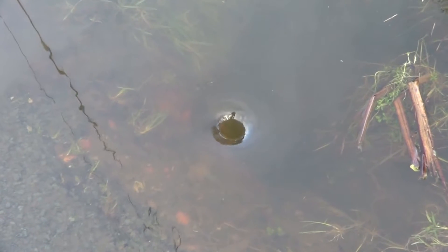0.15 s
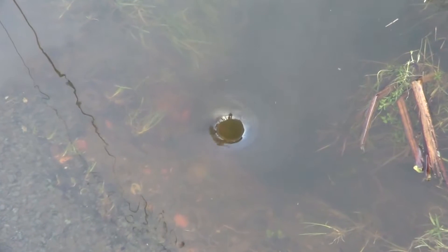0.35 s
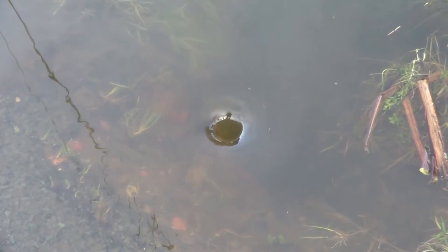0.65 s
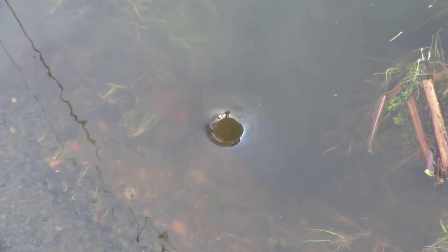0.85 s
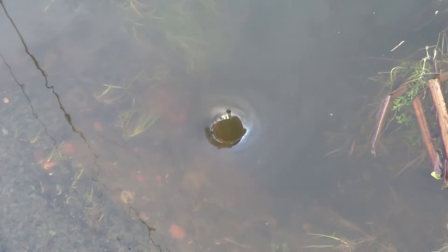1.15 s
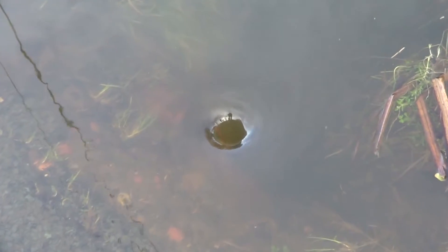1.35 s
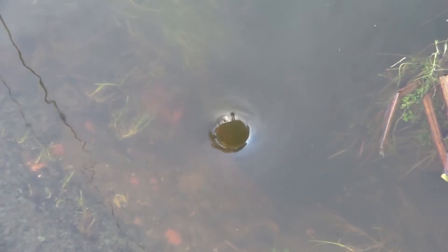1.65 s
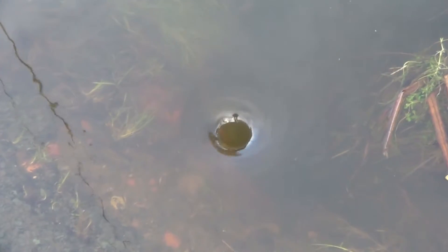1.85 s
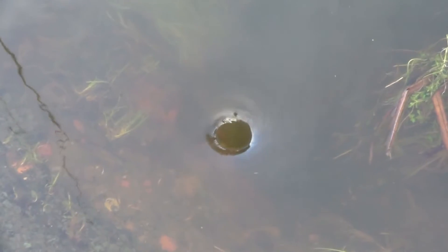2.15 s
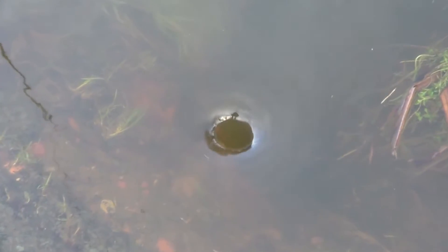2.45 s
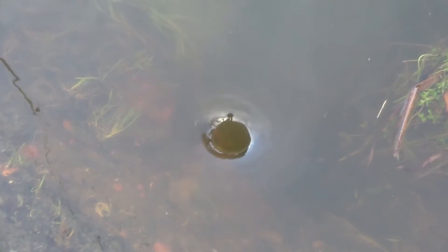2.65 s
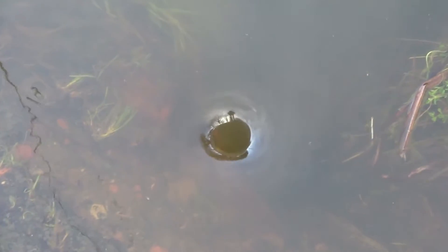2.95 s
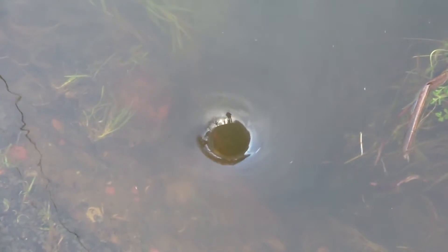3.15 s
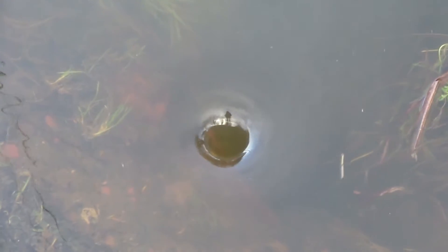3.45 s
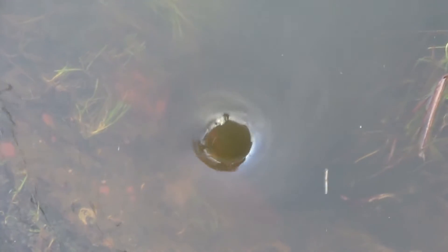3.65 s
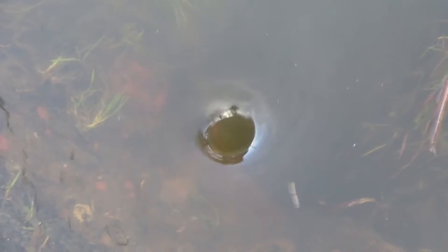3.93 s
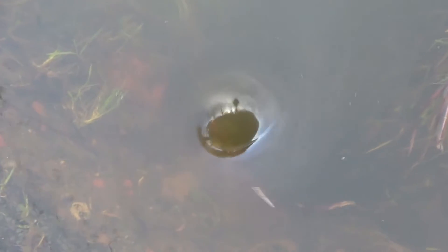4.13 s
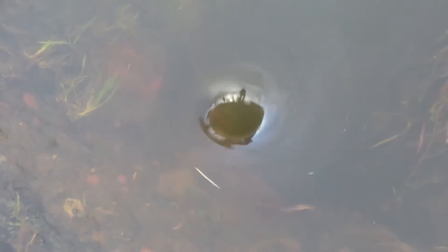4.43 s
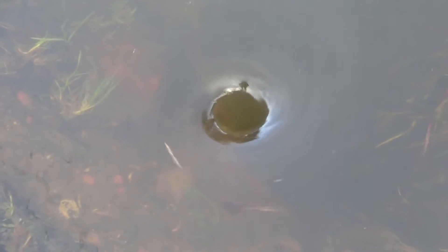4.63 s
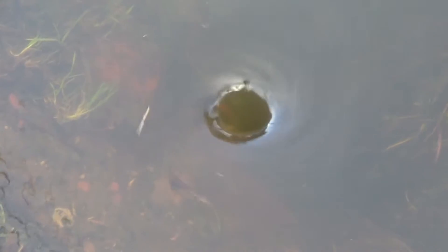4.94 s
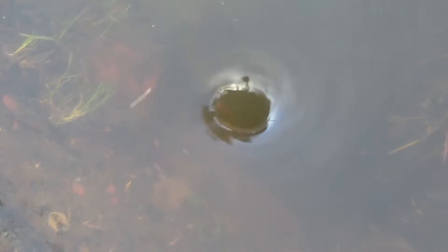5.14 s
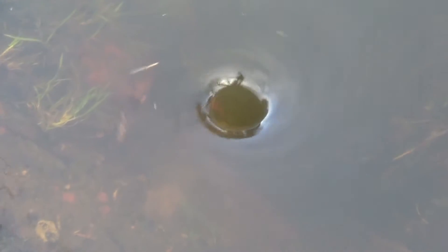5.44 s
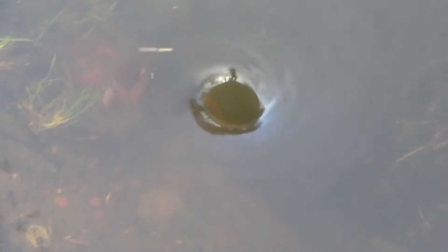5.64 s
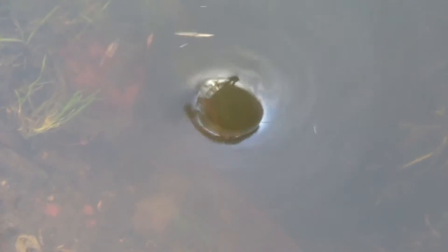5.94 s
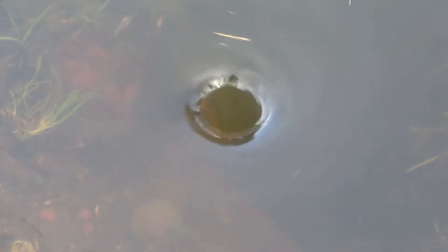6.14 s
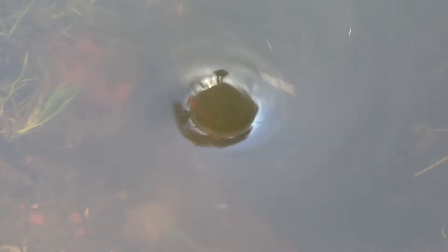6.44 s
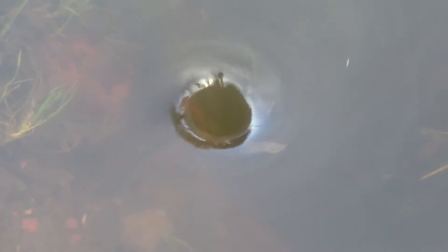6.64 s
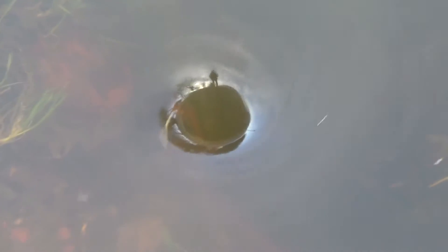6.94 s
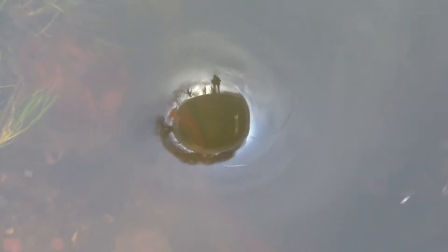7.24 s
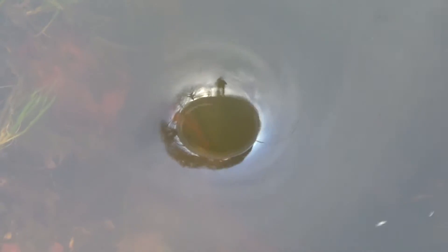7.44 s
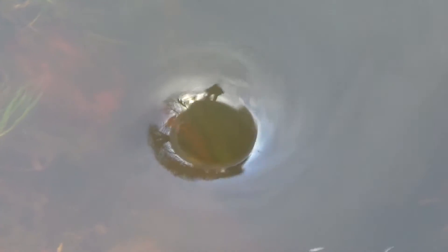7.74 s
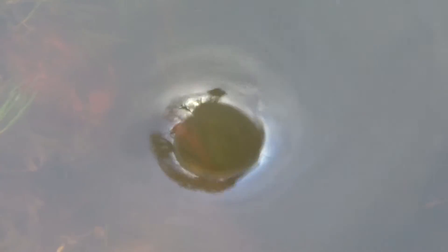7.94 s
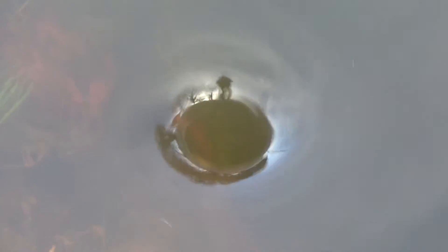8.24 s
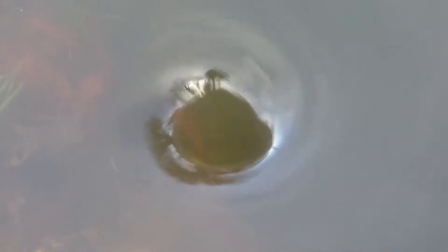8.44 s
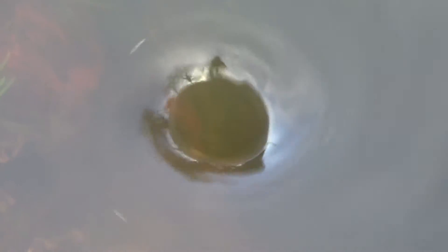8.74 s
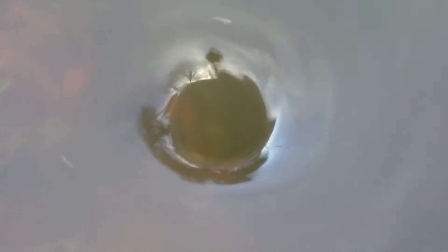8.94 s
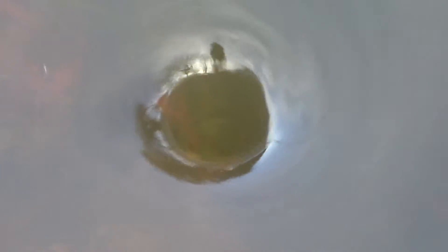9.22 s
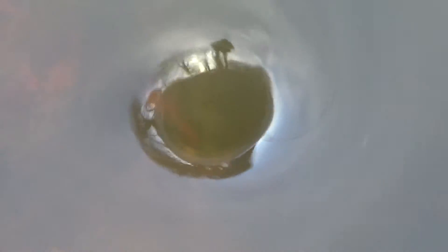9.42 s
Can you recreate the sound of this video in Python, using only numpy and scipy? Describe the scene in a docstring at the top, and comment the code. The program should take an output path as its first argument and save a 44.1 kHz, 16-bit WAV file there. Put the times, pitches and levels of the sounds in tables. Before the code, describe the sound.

Floodwater slurps down a small hole in a road, close to the microphone and straight ahead. It sucks air in quick gulps, with fizzing bubbles, sharp wet pops and a hollow gurgle. The slurping dies down, and small birds give thin whistles and a few chirps some way off. Then the gurgling returns for a second spell and fades, leaving a soft outdoor murmur.

```python
"""Floodwater slurps down a small hole in a road, close to the microphone and almost straight ahead.
Twice the whirlpool sucks air in quick gulps: swarms of bubbles gurgle and fizz, and single air pockets
snap shut and ring the throat of the funnel. In the lulls small birds whistle some way off, over a soft
outdoor murmur; the camera's electronics add a thin steady whine."""
import sys
import numpy as np
from scipy import signal
from scipy.fft import rfft, irfft, next_fast_len
from scipy.io import wavfile
from scipy.ndimage import uniform_filter1d

SR = 44100
rng = np.random.default_rng(int(sys.argv[2]) if len(sys.argv) > 2 else 0)


def generate_wav(sig):
    """Save sig (samples, or channels by samples) to the path in sys.argv[1] as 16-bit PCM at SR."""
    pcm = np.round(np.clip(np.atleast_2d(sig).T, -1, 1) * 32767).astype(np.int16)
    wavfile.write(sys.argv[1], SR, pcm)


N = 422478
TIME = np.arange(N) / SR


def amp(db):
    """Decibels to gain."""
    return 10 ** (np.asarray(db) / 20)


def unit(x):
    """Scales to an rms of one."""
    return x / np.sqrt(np.mean(x ** 2) + 1e-20)


def read(points, hz):
    """Reads a spectrum table on a log-frequency axis."""
    f, value = np.transpose(points)
    return np.interp(np.log(hz + 1), np.log(f + 1), value)


def add(mix, s, sound):
    """Mixes a sound in at s seconds."""
    part = mix[max(round(s * SR), 0):][:len(sound)]
    part += sound[:len(part)]


def wander(hz):
    """A smooth random drift of rms one, with changes up to about hz."""
    size = next_fast_len(N, True)
    f = np.fft.rfftfreq(size, 1 / SR)
    return unit(irfft(rfft(rng.standard_normal(size)) / (1 + (f / hz) ** 4), size)[:N])


def noise_band(hz, width):
    """A narrow band of noise around a pitch."""
    phase = 2 * np.pi * hz * TIME
    return wander(width) * np.cos(phase) + wander(width) * np.sin(phase)


def colour(x, points, size=2048):
    """Causal filter with a given spectrum, so that attacks stay sharp."""
    log_gain = np.log(amp(read(points, abs(np.fft.fftfreq(size, 1 / SR)))))
    taps = np.fft.ifft(np.exp(signal.hilbert(log_gain).conj())).real
    return signal.oaconvolve(x, taps)[:N]


def echoes(x, t60):
    """A diffuse tail of reflections with the energy of its source."""
    t = TIME[:SR // 2]
    tail = rng.standard_normal(len(t)) * amp(-60 * t / t60)
    return signal.oaconvolve(x, tail / np.linalg.norm(tail))[:N]


# Two spells of steady air draw at the hole, close up. Each row: time in seconds, relative level in dB,
# brightness in dB (spray up, large bubbles down).
FIRST_DRAW = [(0, -24, -0.5), (.3, -26.5, -3), (.42, -27, -1), (.9, -23.5, 0), (.98, -32, 0),
              (1.7, -26.5, -5), (2.6, -25.5, -3), (2.7, -31.5, -0.5), (2.85, -51.5, -2)]
SECOND_DRAW = [(5.55, -40.5, -1), (5.761, -25.5, -2.5), (6.0, -26, -1.5), (6.601, -22.5, -2.5),
               (7.149, -26, 1.5), (7.7, -31.0, 2.5), (8.05, -30, 3), (8.25, -36, 3.5), (8.65, -40, 5.5)]
# Separate gulps of air. Each row: start and length in seconds, relative level and brightness in dB.
GULPS = [(0.098, 0.2, -26.5, 2.5), (0.442, 0.21, -28, -1), (0.638, 0.089, -22.5, 0.5),
         (0.747, 0.14, -25.5, -3), (0.889, 0.049, -22, 0.5), (1.001, .08, -25.5, -3.5),
         (1.135, 0.066, -26, -7), (1.26, 0.088, -25, -2.5), (1.463, 0.12, -30.5, -0.5),
         (1.558, 0.086, -23.5, 1.5), (1.675, 0.14, -30.5, 9), (1.816, .12, -22, 1.5),
         (1.943, 0.12, -30.5, 9.5), (2.09, .14, -30, 7.5), (2.288, 0.097, -34, 2.5),
         (2.476, 0.096, -20.5, 0), (2.752, 0.02, -34.5, 1), (2.891, 0.017, -36, 1.5),
         (2.981, .11, -39.5, -2), (3.12, 0.046, -45, -9), (3.339, .127, -41, -1.5),
         (3.487, .124, -42.5, 0.5), (3.986, 0.029, -42, 4), (5.122, .025, -45, 1), (5.374, .055, -35, -3),
         (5.468, 0.048, -33, 3), (5.587, 0.11, -31, -6.5), (5.782, 0.066, -23, -1),
         (5.952, 0.061, -20.5, -5), (6.028, 0.087, -30.5, 5), (6.165, 0.048, -23, 1),
         (6.362, .12, -29, -5.5), (6.523, 0.023, -20.5, 1.5), (6.68, 0.14, -25.5, 1.5),
         (6.861, 0.059, -20, -2), (6.944, 0.27, -25.5, -4.5), (7.243, 0.17, -25, -5.5),
         (7.417, 0.24, -22.5, -1.5), (7.819, 0.08, -24, -1), (7.904, .058, -21.5, 0),
         (8.091, 0.046, -29.5, 6), (8.287, 0.016, -19.5, -3.5), (8.32, 0.052, -26, -2.5),
         (8.414, 0.052, -22.5, -3.5), (8.486, 0.072, -26, -3.5), (8.671, .14, -38, 6),
         (8.952, 0.099, -42.5, 0.5)]
def suction(size):
    """Steady draw plus gulps, in dB, for one bubble size (-1 large, 0 small, 1 spray)."""
    attack_s, release_s, sag_db = .008, 0.016, 1.5
    choke_s, choke_db = 0.032, -1.5  # the draw falters just before each gulp
    draw_power, gulp_power, falter_db = np.zeros((3, N))
    for spell in (FIRST_DRAW, SECOND_DRAW):
        s, level_db, bright_db = np.transpose(spell)
        drawing = (TIME >= s[0]) & (TIME <= s[-1])
        draw_power += amp(np.interp(TIME, s, level_db + size * bright_db)) ** 2 * drawing
    t = TIME[:SR // 2]
    for s, length, level_db, bright_db in GULPS:
        shape = np.minimum(t / attack_s, 1) * np.exp(-np.maximum(t - length, 0) / release_s)
        droop_db = sag_db * (np.minimum(t / length, 1) - .5)
        add(gulp_power, s, (shape * amp(level_db + size * bright_db - droop_db)) ** 2)
        add(falter_db, s - choke_s, choke_db * np.sqrt(t[t < choke_s] / choke_s))
    return 10 * np.log10(draw_power * amp(falter_db) ** 2 + gulp_power + 1e-9)


def bubble(hz, cycles, rise):
    """A ring that falls to 1/e in so many cycles; its pitch climbs as the air pocket shrinks."""
    turns = TIME[:int(6 * cycles / hz * SR) + 2] * hz
    tone = np.sin(2 * np.pi * turns * (1 + rise * turns / cycles))
    return tone * np.exp(-turns / cycles) * (1 - np.exp(-2 * turns))


# Colour of the bubbles beside the hole. Each row: frequency in Hz, relative level in dB.
SLURP_SPECTRUM = [(100, -41), (260, -23), (480, -13.5), (750, -1), (1050, -1), (1450, -0.5), (1950, -11.5),
                  (2350, -9), (2800, -9), (3700, -6.5), (5250, -16.5), (6800, -10.5), (11000, -14.5),
                  (13300, -22.5), (16000, -19)]
def swarm(level_db, surge, low_hz, high_hz, per_s, cycles, rise, spread_db, surge_db, froth_db):
    """Bubbles of random size pinch off: crowded in strong suction and surges, single when it slackens."""
    count = 30000
    when, chance, pitch, strength, damping = rng.random((count, 5)).T
    at = (when * (N - 1)).astype(int)
    strong_db = np.percentile(level_db[::SR // 100], 80)
    crowd = np.clip(amp(.8 * (level_db - strong_db)), .08, 1.3)
    born = chance < per_s * crowd[at] * amp(2 * surge[at]) * N / SR / count
    hz = low_hz * (high_hz / low_hz) ** pitch
    # a lone bubble in calm water rings longer than one in the froth
    crowding = np.where(hz < 4500, crowd[at], np.sqrt(crowd[at]))
    ring_cycles = cycles * 3.1 ** (2 * damping - 1) / crowding ** 0.8
    bubble_db = spread_db * np.minimum(-np.log(1 - strength), 4) + surge_db * surge[at]
    height = amp(bubble_db) * hz / np.sqrt(ring_cycles)
    bubbles = np.zeros(N)
    for i in np.flatnonzero(born):
        add(bubbles, at[i] / SR, height[i] * bubble(hz[i], ring_cycles[i], rise))
    # countless faint bubbles merge into a wet froth where the swarm is dense
    band = signal.butter(4, [low_hz, high_hz], "bandpass", fs=SR, output="sos")
    froth = signal.sosfilt(band, rng.standard_normal(N)) * crowd * amp(surge_db * surge)
    mix = unit(colour(unit(bubbles) + amp(froth_db) * unit(froth), SLURP_SPECTRUM))
    # the bubbles of any moment share the energy that the suction supplies
    power = uniform_filter1d(uniform_filter1d(mix ** 2, size=2200), size=1600)
    return amp(level_db) * mix / np.sqrt(abs(power) + 1e-3)


def slurp():
    """Large, small and tiny bubbles, all driven by the same unsteady collapse of the funnel."""
    surge = np.clip(wander(hz=46.8), -2, 2)
    gurgle = swarm(suction(size=-1), surge, low_hz=298.4, high_hz=1909, per_s=430,
                   cycles=3.14, rise=0.0047, spread_db=4.0, surge_db=1.05, froth_db=-12)
    babble = swarm(suction(size=0), surge, low_hz=1910, high_hz=5280, per_s=1200,
                   cycles=1.87, rise=0.011, spread_db=5.0, surge_db=1.8, froth_db=-7.5)
    spray = swarm(suction(size=1), surge, low_hz=5180, high_hz=14380, per_s=1300,
                  cycles=2.34, rise=0.013, spread_db=5.5, surge_db=2.0, froth_db=-8.5)
    flicker = amp(1.27 * wander(hz=16.4))
    return (amp(-5.0) * gurgle + amp(-0.66) * babble + amp(-0.05) * spray) * flicker


def stray_pockets(per_s=10, over_draw_db=14, throat_db=-10.5, count=400):
    """Rows for lesser pockets that burst at random, as strongly as the whirlpool draws air."""
    when, chance, strength, pitch, throat = rng.random((count, 5)).T
    at = (when * (N - 1)).astype(int)
    level_db = suction(size=0)[at] + over_draw_db + 9 * (strength - .5)
    bubble_hz, throat_hz = 2300 * 3.2 ** (pitch ** 2), 780 * 2.16 ** throat
    rows = np.transpose([at / SR, level_db, bubble_hz, throat_hz, level_db + throat_db])
    return rows[chance < per_s * N / SR / count]


# Air pockets snapping shut close to the microphone. Each row: start in seconds, relative level in dB,
# bubble pitch in Hz, throat pitch in Hz, relative throat level in dB.
AIR_POCKETS = [(.049, -8, 2060, 1090, -12), (.085, -9, 2540, 1070, -19.5), (.2005, -2, 6740, 985, -9),
               (.2344, -10.5, 3600, 1240, -19), (.5135, 1.5, 3700, 1390, -16.5),
               (.7424, 4, 3600, 1100, -29.5), (.838, -1.5, 3740, 1050, -12), (1.2699, 4.5, 3780, 1220, -15),
               (1.334, -2, 3340, 1250, -18), (1.4488, -9, 6860, 805, -41), (1.4663, -1, 2430, 850, -21),
               (1.554, 3, 2950, 1160, -18), (2.1317, -6, 6700, 980, -16.5), (2.249, -6.5, 3650, 990, -19.5),
               (2.2757, -12, 2610, 1580, -19), (2.4858, 0, 3700, 800, -13), (2.5047, -7, 6700, 1470, -15),
               (2.5462, 4, 3480, 1780, -11), (2.57, -9, 8500, 1590, -26), (2.77, -11, 4000, 985, -29),
               (2.8983, -16, 2380, 794, -44), (2.9968, -22, 5370, 1460, -19.5),
               (3.0495, -22, 6000, 1340, -38), (3.09, -15, 2950, 684, -45), (3.148, -22, 2200, 1430, -24),
               (3.35, -23, 3060, 1330, -34), (3.3978, -28, 6150, 1630, -28), (5.141, -20, 3400, 1050, -46),
               (5.394, -14, 3400, 1460, -22), (5.4742, -4.5, 2550, 1353, -13),
               (5.4933, -11, 2230, 1730, -38), (5.5164, -9.5, 7040, 1730, -39),
               (5.5725, -11, 3870, 1680, -34), (5.59, -1, 2780, 1390, -11.5), (5.5957, -1, 2740, 904, -13),
               (5.6575, -5, 2550, 846, -16), (5.6755, -13, 3330, 1130, -11.5),
               (5.7527, -11, 3080, 1714, -19), (5.956, -10, 3340, 1450, -8), (6.098, 4, 2460, 1034, -12),
               (6.2593, -7, 3210, 1260, -14), (6.4704, -8.5, 2770, 1004, -15.5),
               (6.5288, -8.5, 3920, 1274, -8), (6.5518, 2, 2550, 810, -9), (6.8707, -6, 2920, 1030, -10.5),
               (7.0294, -17, 8450, 950, -9), (7.0875, -9, 2370, 1334, -9), (7.3206, -7, 2520, 1510, -24),
               (7.3667, 6, 3210, 1740, -36), (7.437, -1, 8400, 1040, -16), (7.4864, -1, 6800, 1320, -15),
               (7.522, -3, 7200, 1380, -37), (7.6968, -0.5, 3170, 857, -23), (7.8024, 2.5, 9700, 1560, -22),
               (7.9123, -3.5, 2390, 1147, -7.5), (7.9517, -1, 2680, 840, -16), (8.012, -6, 6950, 844, -29),
               (8.1165, -6, 9000, 816, -27), (8.2487, -12, 2690, 807, -48), (8.3004, 3, 3120, 780, -9),
               (8.3544, -6, 10800, 1264, -11), (8.404, -3.5, 3100, 1640, -16), (8.434, -3, 3300, 800, -9.5),
               (8.561, -5, 6900, 886, -25), (8.6807, -19, 8540, 690, -38), (8.961, -20, 6500, 990, -49)]
def pops(crack_hz=7200, low_hz=420):
    """Each pocket cracks, rings as a bubble and sets the air in the throat of the funnel ringing."""
    out = np.zeros(N)
    for s, level_db, hz, throat_hz, throat_db in [*AIR_POCKETS, *stray_pockets()]:
        softness = amp(-.3 * np.clip(level_db, -25, 0))  # soft pops ring on as plinks, hard ones click
        plink = bubble(hz, cycles=1.45 * softness * (hz / 2500) ** 0.84, rise=0.0038)
        add(out, s + 0.00067, amp(level_db) / softness * bubble(crack_hz, cycles=1.5, rise=0.026))
        add(out, s + 0.00081, amp(level_db + 5.0) * plink)
        add(out, s + 0.000995, amp(throat_db + 1.0) * bubble(throat_hz, cycles=5.5, rise=0.0014))
    # small pockets radiate little bass
    return signal.sosfilt(signal.butter(2, low_hz, "highpass", fs=SR, output="sos"), out)


def resonate(x, hz, width):
    """A moving resonance of gain one: shifts the curve hz down to zero, smooths, and shifts back."""
    turn = np.exp(2j * np.pi * np.cumsum(hz) / SR)
    pole = np.exp(-np.pi * width / SR)
    return 2 * (turn * signal.lfilter([1 - pole], [1, -pole], x / turn + 1e-18)).real


# The air column in the funnel's throat. Each row: pitch in Hz, width in Hz, gain in dB.
THROAT_MODES = [(557, 26, -7), (695, 14, -10), (863.4, 14.7, 1.5), (1041, 30, 0), (1248, 19, 3.5),
                (1388, 32, 0), (1590, 50, -7), (1724, 35, 6), (2450, 19, 1)]
def funnel(bubbles):
    """The throat rings hollow after every bubble; its upper pitches sway most as the whirlpool wobbles."""
    out = bubbles
    for hz, width, db in THROAT_MODES:
        sway = 1 + 0.02 * min(hz / 1000, 1.4) ** 2 * wander(hz=2.5)
        out = out + amp(db) * resonate(bubbles, hz * sway, width)
    return out


def rumble(level_db=-58, db_per_draw_db=0.28):
    """Water tumbling down the hole rumbles faintly, more when it draws air."""
    spectrum = [(20, -15), (60, -0.5), (130, 1), (250, -6.5), (600, -33), (2000, -72)]
    noise = unit(colour(rng.standard_normal(N), spectrum))
    return amp(level_db + db_per_draw_db * (suction(size=-1) + 26.5)) * noise


# Distant surroundings, heard from the road. Each row: frequency in Hz, relative level in dB.
MURMUR_SPECTRUM = [(20, -36), (45, -20), (65, -11), (150, -8), (260, -1), (400, -5), (520, -4), (850, 0.5),
                   (1150, -6), (1450, -11), (2200, -14), (3400, -13), (5000, -22), (9000, -40)]
# How alike the microphone's two sides are. Each row: frequency in Hz, likeness from 0 to 1.
STEREO_LIKENESS = [(60, 1), (290, 0.79), (700, 0.42), (1400, 0.1), (3000, 0.29), (7000, 0.64), (15000, 1)]
# A faint buzz that swells and fades. Each row: time in seconds, level in dB.
BUZZ_SWELL = [(0, -63), (3.3, -56.5), (4.1, -53.5), (5.3, -57), (8.9, -67), (9.58, -82)]
def outdoors():
    """A soft distant murmur with a low hum and a faint buzz, under even microphone hiss."""
    hz = np.fft.rfftfreq(N, 1 / SR)
    left, unrelated = rfft(rng.standard_normal((2, N)))
    likeness = np.clip(read(STEREO_LIKENESS, hz), 0, 1)
    pair = np.array([left, likeness * left + np.sqrt(1 - likeness ** 2) * unrelated])
    murmur = unit(irfft(pair * amp(read(MURMUR_SPECTRUM, hz)), N))
    murmur *= amp(-41 + 1.3 * wander(hz=4.9))
    hiss_spectrum = [(2500, -9.0), (5500, -3.5), (8500, 2.5), (11000, -4), (16000, -2.5)]
    hiss = unit(irfft(pair * amp(read(hiss_spectrum, hz)), N))
    hum = unit(amp(3 * wander(hz=4)) * noise_band(hz=312, width=19))
    buzz_db = np.interp(TIME, *np.transpose(BUZZ_SWELL)) + 3.6 * wander(hz=14)
    buzz = amp(buzz_db) * noise_band(hz=3820, width=75)
    return murmur + amp(-47.5) * hiss + amp(-53.5) * hum + buzz


# The camera's own steady tone and its sidebands. Each row: frequency in Hz, level in dB.
WHINE_LINES = [(15475, -66), (15525, -60), (15575, -58), (15625, -48), (15675, -58), (15725, -61)]
def camera_whine():
    """The electronics whine very high, with a skirt of noise."""
    lines = sum(amp(db) * unit(np.sin(2 * np.pi * (hz * TIME + rng.random()))) for hz, db in WHINE_LINES)
    return lines + amp(-58) * noise_band(hz=15550, width=280)


def bird_note(hz, level_db, rasp):
    """A nearly pure note, its low parts with a faint octave; rasp shakes the pitch quickly."""
    shake = unit(uniform_filter1d(rng.standard_normal(len(hz)), size=14))
    phase = 2 * np.pi * np.cumsum(hz * (1 + 0.168 * rasp * shake)) / SR
    octave = amp(-24.0) * np.sin(2 * phase) * np.clip((6400 - hz) / 800, 0, 1)
    return amp(level_db) * unit(np.sin(phase) + octave) * signal.windows.tukey(len(hz), .05)


def whistle(length, level_db, top_hz, end_hz, rise_s, swell_db):
    """The pitch scoops up to its top and sinks: an arch after a slow rise, a slur after a quick one."""
    scoop, arch_s, waver_depth, waver_hz = .045, 0.083, 0.052, 8
    t = np.arange(0, length, 1 / SR)
    rising = np.maximum(1 - t / rise_s, 0)
    falling = np.maximum(t - rise_s, 0) / (length - rise_s)
    drop_hz = top_hz - end_hz
    hz = top_hz * (1 - scoop * rising ** 2) - drop_hz * falling ** (.65 + .5 * rise_s / arch_s)
    waver = waver_depth * drop_hz * np.sin(2 * np.pi * waver_hz * t)
    return bird_note(hz + waver, level_db + swell_db * (t / length - .5), rasp=0.0087)


# The course of one chirp. Each row: time in seconds, share of the way from end pitch to top pitch,
# relative level in dB, rasp from 0 to 1.
CHIRP_COURSE = [(0, 0.082, -14, 1), (0.015, 0.71, -7, 0.94), (0.03, 0.91, -3, 0.19),
                (0.048, 0.55, -2.5, .1), (0.057, .3, 1, .1), (.071, 0.079, -7.5, 0.53),
                (.079, 0.24, -25, 0.3)]
def chirp(level_db, top_hz, end_hz):
    """A short note that rasps upward and clears as it falls."""
    s, *columns = np.transpose(CHIRP_COURSE)
    t = np.arange(0, s[-1], 1 / SR)
    height, shape_db, rasp = (np.interp(t, s, column) for column in columns)
    return bird_note(end_hz + height * (top_hz - end_hz), level_db + shape_db, rasp)


# Thin whistles of two birds, some way off. Each row: start and length in seconds, level in dB,
# top and end pitch in Hz, rise in seconds, swell from start to end in dB, left minus right in dB.
WHISTLES = [(2.648, 0.34, -45.5, 8450, 8040, 0.1, -12.5, -4),
            (3.418, 0.26, -41, 8600, 7150, 0.0079, 15, .3), (3.746, 0.16, -30.5, 8200, 6490, 0.0093, 11, 0),
            (4.658, 0.42, -44.5, 8520, 7800, 0.14, -11, -3), (9.116, .46, -47, 8460, 7880, 0.17, -2, -7)]
# Chirps that end the song. Each row: start in seconds, relative level in dB, top and end pitch in Hz.
CHIRPS = [(3.973, -28, 6200, 4710), (4.087, -24.5, 6050, 5000), (4.2, -29.5, 6420, 4840),
          (4.322, -32.5, 6260, 5070)]
def birds(chirp_pan_db=1):
    """Whistles and chirps flutter in the air on their way to the microphone and echo faintly."""
    notes = [(start, whistle(*row), pan_db) for start, *row, pan_db in WHISTLES]
    notes += [(start, chirp(*row), chirp_pan_db) for start, *row in CHIRPS]
    left, right = np.zeros((2, N))
    for start, sound, pan_db in notes:
        leading = (signal.hilbert(sound) * np.exp(.35j)).real  # reaches the right side first
        add(left, start, amp(pan_db / 2) * sound)
        add(right, start, amp(-pan_db / 2) * leading)
    direct = np.array([left, right]) * amp(3.9 * wander(hz=60.5))
    return direct + amp(-5.0) * np.array([echoes(side, t60=0.33) for side in direct])


# The water's arrival at the microphone. Each row: frequency in Hz, lead of left over right in radians.
PHASE_LEAD = [(0, 0), (780, -0.26), (4390, 0.049), (8010, -0.22), (10100, -0.027), (15900, -0.0)]
# Scatter off the water surface and kerb. Each row: frequency in Hz, side minus mid in dB.
KERB_SCATTER = [(100, -30), (500, -15), (1200, -10), (2000, -23), (3400, -57), (4400, -14.5), (6300, -15.5),
                (9000, -12), (11000, -34), (15000, -32)]
def scene():
    """The hole lies almost straight ahead; reflections give it a little width."""
    water = funnel(slurp() + pops()) + rumble()
    turn = np.exp(.5j * read(PHASE_LEAD, np.fft.rfftfreq(N, 1 / SR)))
    direct = irfft(rfft(water) * np.array([turn, 1 / turn]), N)
    side = colour(echoes(water, t60=0.011), KERB_SCATTER)
    return direct + np.array([side, -side]) + birds() + outdoors() + camera_whine()


def record(dry, edge_hz=15850):
    """The loudest snaps overload the input; a steep low-pass then cuts the highest treble."""
    lowpass = signal.firwin(801, edge_hz, window=("kaiser", 8), fs=SR)
    return signal.oaconvolve(np.clip(dry, -1, 1), lowpass[None], "same", axes=1)


dry = scene()
out = record(dry)
generate_wav(out)
```